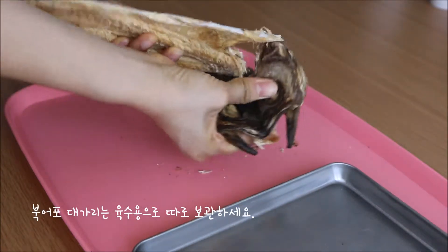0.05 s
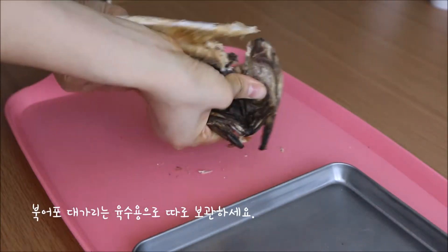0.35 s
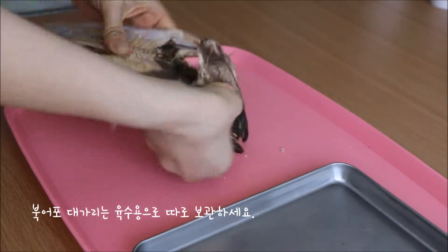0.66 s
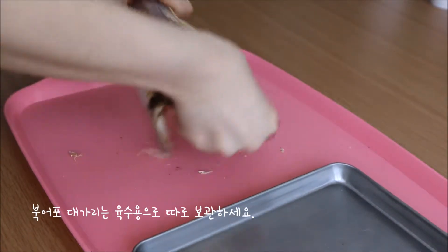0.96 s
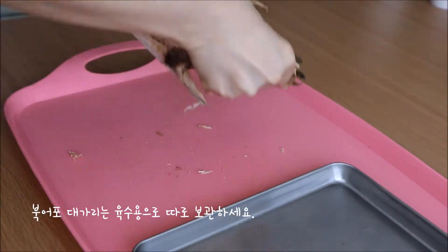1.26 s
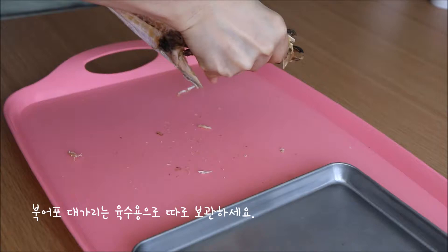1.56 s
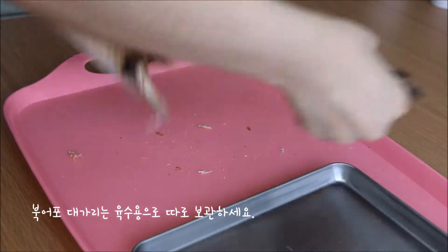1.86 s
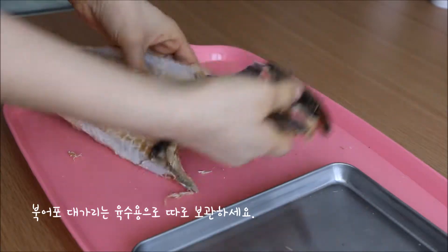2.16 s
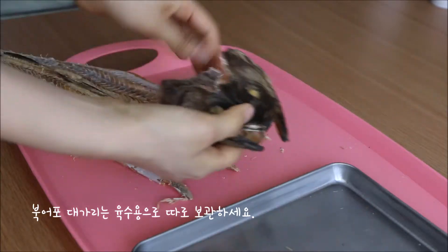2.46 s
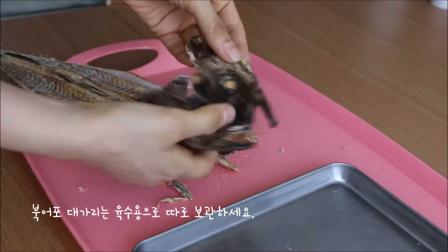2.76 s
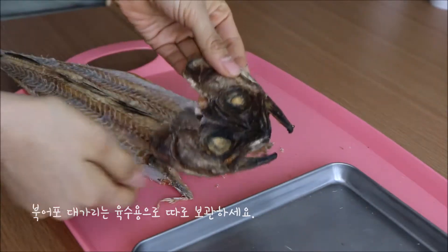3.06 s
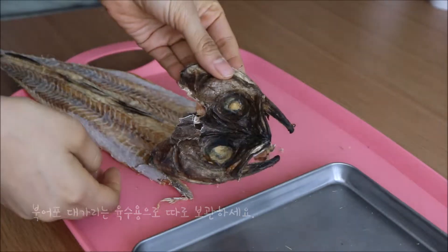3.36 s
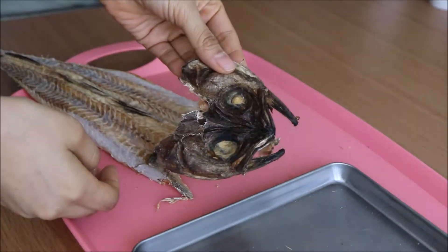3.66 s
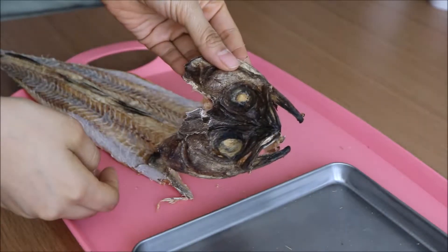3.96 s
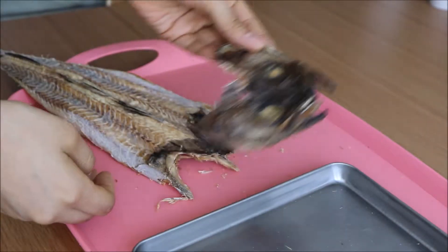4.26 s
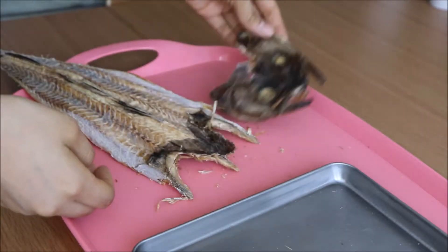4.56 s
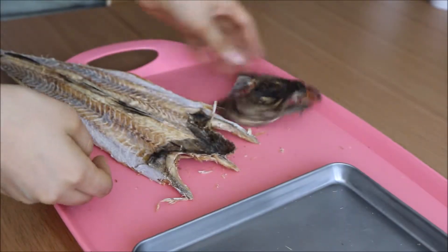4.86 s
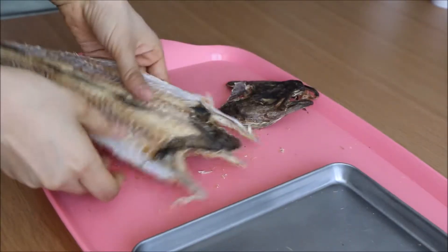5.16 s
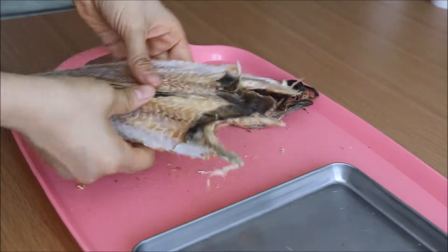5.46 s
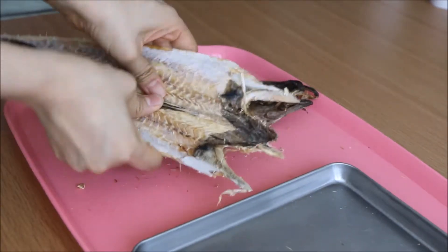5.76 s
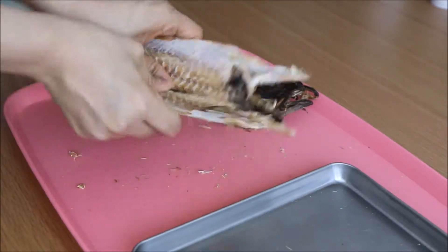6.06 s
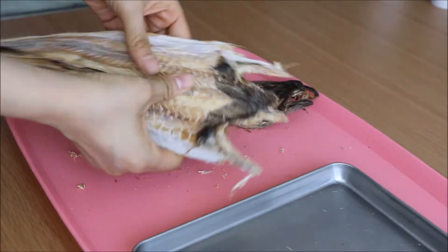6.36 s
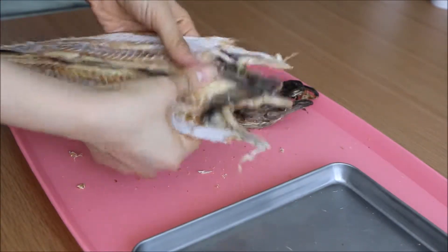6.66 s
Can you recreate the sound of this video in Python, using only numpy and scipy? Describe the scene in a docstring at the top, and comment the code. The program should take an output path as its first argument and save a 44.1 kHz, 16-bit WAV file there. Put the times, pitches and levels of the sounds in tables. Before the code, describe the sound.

Hands tear apart a brittle dried fish, crackling and snapping in bursts, with knocks on a plastic cutting board.

```python
"""A brittle dried fish is torn apart by hand over a plastic board in a bare kitchen.
Its fibres fail in avalanches of tiny fractures, its bones snap and its skin creaks by stick-slip
friction, all ringing the stiff body. Knocks and drags excite the modes of the board; jolts thud in
the table. The room reverberates, and a camera's focus drive ticks softly near the microphones."""
import sys
import numpy as np
from scipy import signal
from scipy.fft import rfft, irfft
from scipy.io import wavfile
from scipy.ndimage import uniform_filter1d

SR = 44100
rng = np.random.default_rng(int(sys.argv[2]) if len(sys.argv) > 2 else 0)


def generate_wav(sig):
    """Save sig (samples, or channels by samples) to the path in sys.argv[1] as 16-bit PCM at SR."""
    pcm = np.round(np.clip(np.atleast_2d(sig).T, -1, 1) * 32767).astype(np.int16)
    wavfile.write(sys.argv[1], SR, pcm)


N = 299880
TIME = np.arange(N) / SR
LEFT_RIGHT = np.array([[1], [-1]])

# Bones and skin snapping. Each row: start in seconds, relative level in dB, centre frequency in Hz.
BREAKS = [(0.143, -38, 5560), (0.3075, -24, 5100), (0.3145, -23, 4630), (0.457, -23.5, 3150),
          (0.513, -25, 3380), (0.648, -28.5, 5900.0), (0.6997, -34, 3700.0), (0.7522, -28, 6250),
          (0.7762, -18.5, 2200), (0.783, -24, 2800), (0.812, -23, 3080), (1.002, -31.5, 3270),
          (1.095, -33, 4800), (1.183, -34.5, 4700), (1.209, -32, 5400), (1.3, -38, 4200.0),
          (1.428, -31, 5500.0), (1.508, -32.5, 5000.0), (1.5972, -15.5, 4380), (1.5992, -16, 4200),
          (1.601, -20, 3900), (1.606, -22, 4900), (2.573, -51, 4260), (2.586, -48, 3300.0),
          (2.683, -53, 2500.0), (4.423, -48, 2520), (5.667, -46, 3800.0), (5.757, -25.5, 9100),
          (5.815, -27, 5760), (5.8549, -19.5, 6000), (5.8583, -23.5, 6260), (5.9082, -24, 3800.0),
          (5.9303, -15, 2920), (5.935, -23, 2020), (5.9384, -22.5, 2000), (6.376, -40, 2600)]


def undb(db):
    """Amplitude ratio of a level in decibels."""
    return 10 ** (np.asarray(db) / 20)


def unit(x):
    """Normalisation to an rms of 1."""
    return x / np.sqrt(np.mean(x ** 2))


def burst(x, db):
    """Equivalent level: x gets the energy of 10 ms of sound at db."""
    return x * undb(db) * np.sqrt(SR / 100 / np.sum(x ** 2))


def add(out, start_s, x):
    """Superposition of x on out from start_s."""
    i = min(max(int(start_s * SR), 0), N - 1)
    out[i:i + len(x)] += x[:N - i]


def at(points, hz):
    """Interpolation of (Hz, value) points on a log-frequency axis."""
    f, value = np.transpose(points)
    return np.interp(np.log(np.maximum(hz, 1)), np.log(f), value)


def ring(x, response):
    """Convolution with an impulse response."""
    return signal.fftconvolve(x, response)[:len(x)]


def highpass(x, hz=3200, order=1):
    """Butterworth high-pass filter."""
    return signal.sosfilt(signal.butter(order, hz, "high", fs=SR, output="sos"), x)


def band(x, hz, q):
    """Two-pole resonance with unit gain at its centre."""
    w = 2 * np.pi * min(hz, SR * .45) / SR
    a = np.sin(w) / (2 * q)
    return signal.lfilter([a, 0, -a], [1 + a, -2 * np.cos(w), 1 - a], x)


def colour(points, size=4096):
    """Minimum-phase impulse response of unit energy with the given (Hz, dB) spectrum."""
    cepstrum = irfft(np.log(undb(at(points, np.fft.rfftfreq(size, 1 / SR)))))
    cepstrum[1:size // 2] *= 2
    cepstrum[size // 2 + 1:] = 0
    return unit(irfft(np.exp(rfft(cepstrum)))) / np.sqrt(size)


def modes(rows, click, size=16384):
    """Modal impulse response of unit energy: a contact click plus damped sinusoids."""
    t = np.arange(size) / SR
    response = sum(undb(db - 60 * t / t60) * np.cos(2 * np.pi * hz * t) for hz, db, t60 in rows)
    response[0] += click
    return unit(response) / np.sqrt(size)


def clicks(rate, spread_db, even_s):
    """Poisson impulses of random size, their power held near 1 over even_s."""
    chance, size, sign = rng.random(N), rng.standard_exponential(N), rng.choice([-1, 1], N)
    x = (chance < rate / SR) * sign * undb(spread_db * np.minimum(size, 3.2))
    return x / np.sqrt(np.abs(uniform_filter1d(x ** 2, int(even_s * SR))) + 1e-6)


def wander(rate_hz):
    """Random modulation with an rms of 1."""
    knots = rng.standard_normal(N // 50)
    return unit(np.interp(TIME * rate_hz, np.arange(len(knots)), knots))


def strokes(rows, attack_s, release_s, share=1):
    """Incoherent sum of envelopes that rise, hold and decay, each giving a share of its power."""
    power = np.zeros(N)
    for (start, length, db, *_), part in zip(rows, np.ones(len(rows)) * share):
        t = np.arange(int((length + 10 * release_s) * SR)) / SR
        envelope = np.minimum(t / attack_s, 1) * np.exp(-np.maximum(t - length, 0) / release_s)
        add(power, start, np.clip(part, 0, 1) * (undb(db) * envelope) ** 2)
    return np.sqrt(power)


def background(whir_hz=1625, whir_db=-69):
    """Broadband noise gives room rumble and microphone hiss; narrowband noise, a small motor's whir."""
    # Noise floor. Each row: frequency in Hz, relative level in dB.
    spectrum = [(13, -60), (22, -5.5), (80, 0), (109, -9), (165, -2), (205, -20), (236, -3), (337, -9),
                (910, -11), (988, -14.5), (1130, -14), (1620, -7.5), (1810, -20), (3320, -26),
                (16000, -39.5)]
    mid, side = (ring(rng.standard_normal(N), colour(spectrum)) for _ in range(2))
    floor = mid + 1.45 * highpass(side, 900) * LEFT_RIGHT
    whir = unit(band(band(rng.standard_normal(N), whir_hz, q=13), whir_hz, q=13))
    return undb(-58 + 0.097 * wander(7.6)) * floor + undb(whir_db) * whir


def kitchen(x, wet_db, coherent_hz=2400, onset_s=0.0021, scatter_s=0.0015, size=24000):
    """Diffuse reverberation: closely spaced microphones hear its bass alike and its treble apart."""
    # Decay of the room. Each row: frequency in Hz, 60 dB decay time in seconds.
    decay_times = [(100, 0.36), (400, 0.39), (1200, 0.3), (3000, 0.3), (6000, 0.36), (14000, 0.3)]
    t, f = np.arange(size) / SR, np.fft.rfftfreq(size, 1 / SR)
    mid, side = rfft(rng.standard_normal((2, size)))
    coherence = 0.91 / (1 + (f / coherent_hz) ** 2)
    spectra = np.sqrt(1 + coherence) * mid + np.sqrt(1 - coherence) * side * LEFT_RIGHT
    centres = np.geomspace(100, 16000, 6)
    tail = 0
    for hz, pick in zip(centres, np.eye(len(centres))):
        band_noise = irfft(spectra * at(np.c_[centres, pick], f), size)
        tail += band_noise * undb(-60 * t / at(decay_times, hz))
    tail = unit(tail * np.clip(t / onset_s - .3, 0, 1)) * undb(wet_db)
    # short waves scatter off the camera body on their way to each microphone
    scatter = unit(rng.standard_normal(size) * np.exp(-t / scatter_s))
    responses = (tail + 0.73 * highpass(scatter) * LEFT_RIGHT) / np.sqrt(size)
    return np.array([ring(x, response) for response in responses])


def reflections(x, wet_db, spots, hop_hz):
    """Reflections depend on source position: x crossfades from spot to spot at constant power."""
    offsets = ((TIME * hop_hz - k + spots / 2) % spots - spots / 2 for k in range(spots))
    return sum(kitchen(x * np.cos(np.pi / 2 * np.clip(d, -1, 1)), wet_db) for d in offsets)


def focus_drive(tick_hz=1120, stop_hz=700, stop_s=0.0016, rebound=.42, rebound_s=0.012, size=3000):
    """Impact and rebound: the lens ticks, knocks on its stop, bounces twice and rings its barrel."""
    # Lens steps. Each row: start in seconds, relative level of the knock in dB.
    steps = [(0.405, -38), (0.674, -33.5), (1.045, -34.5), (1.169, -38.5), (1.217, -37.5), (1.329, -45),
             (1.365, -36.5), (1.489, -43), (1.526, -37), (1.695, -34.5), (1.728, -40), (1.776, -37),
             (1.969, -38.5), (2.018, -35.5), (2.321, -41), (2.356, -49), (2.608, -37.5), (2.667, -33.5),
             (2.735, -33.5), (2.769, -44), (2.806, -36), (2.929, -43), (2.966, -35.5), (3.088, -42.5),
             (3.125, -36), (4.849, -35), (4.892, -29.5), (5.123, -33), (5.296, -38), (5.407, -43),
             (5.454, -33.5), (5.534, -32.5), (5.568, -42), (5.604, -35), (5.728, -37), (5.777, -36.5)]
    out, t = np.zeros(N), np.arange(size) / SR
    for start, db in steps:
        kick = 0.08 * rng.standard_normal(size) * np.exp(-t / 0.013)
        kick[0] += 1
        tick = band(band(kick, tick_hz, q=1.65), tick_hz, q=1.4)
        pitch = stop_hz * (1 + 0.034 * rng.standard_normal())
        knock = np.exp(-((t - .0045) / stop_s) ** 2) * np.sin(2 * np.pi * pitch * t)
        barrel = band(knock, hz=765, q=31)
        bounces = sum(rebound ** k * np.roll(knock, int(k * rebound_s * SR)) for k in range(3))
        housing = np.roll(band(band(kick, 393, q=1.6), 393, q=1.6), int(0.0029 * SR))
        impact = burst(bounces, db - 3) + burst(barrel, db - 8.5) + burst(housing, db - 11.5)
        add(out, start, burst(tick, -44) + impact)
    return out


def table_thuds(gain_db=-3, width_octaves=0.79, sag_octaves_per_s=4.3):
    """Structure-borne sound: bumps pass into the table top; each thud deepens as the push settles."""
    # Pushes of hands and fish. Each row: start and length in seconds, relative level in dB,
    # initial centre frequency in Hz.
    jolts = [(0, .025, -42.5, 206), (0.799, 0.062, -27.5, 215), (0.902, 0.084, -39.5, 151),
             (3.713, 0.037, -48.5, 163), (3.82, 0.02, -55, 142), (4.056, 0.12, -44, 175),
             (4.335, .06, -48.5, 34), (4.412, .05, -51.5, 130), (5.216, .03, -30.5, 420),
             (5.25, 0.067, -29, 260), (5.366, 0.053, -34, 163), (5.497, 0.051, -40, 142),
             (5.618, 0.14, -47.5, 37), (6.494, 0.27, -45, 159), (6.682, 0.018, -31, 170),
             (6.765, 0.15, -36, 179)]
    starts, _, _, hz = np.transpose(jolts)
    latest = np.maximum(np.searchsorted(starts, TIME) - 1, 0)
    centre_octave = np.log2(hz[latest]) - sag_octaves_per_s * (TIME - starts[latest])
    bumps = clicks(rate=290, spread_db=3.5, even_s=0.012)
    out, power = 0, 0
    for k, f in enumerate(np.geomspace(32, 640, 10)):
        weight = 1 / (1 + ((np.log2(f) - centre_octave) / width_octaves) ** 2) ** 2
        delayed = np.roll(bumps, k * k * 30)  # decorrelates the bands
        out += weight * unit(band(band(delayed, f, q=1.24), f, q=1.24))
        power += weight ** 2
    return undb(gain_db) * strokes(jolts, attack_s=0.0096, release_s=0.049) * out / np.sqrt(power)


def plastic_board(knock_db=-7, drag_db=-5, chatter_db=-21, chatter_s=0.018, size=2500):
    """Chattering impacts and stick-slip friction excite the modes of the plastic board."""
    # Board modes. Each row: frequency in Hz, relative level in dB, 60 dB decay time in seconds.
    board_modes = [(134, -14.5, 0.35), (212, -41, 0.17), (252, -12, 0.19), (415, -3, 0.11),
                   (571, -9.5, 0.13), (692, -5.5, 0.029), (792, -2, 0.064), (872, -13, 0.2),
                   (980, -10, 0.12), (1012, -5.5, 0.21), (1036, -8, 0.08), (1113, -5.5, 0.06),
                   (1205, 1, 0.25), (1319, -7, 0.12), (1470, -9, 0.088), (1800, -14, .08),
                   (2060, -34, 0.054)]
    # Blows of fish and fingers. Each row: start in seconds, relative level in dB, cutoff in Hz.
    knocks = [(.7, -19.5, 1520), (.776, -21, 4000), (2.116, -16, 1370), (2.123, -12, 1360),
              (2.131, -17, 1300), (4.615, -24.5, 1070), (4.636, -22.5, 755), (4.689, -26.5, 1380),
              (4.85, -26.5, 1220), (4.893, -22, 790), (4.904, -18.5, 2780), (4.979, -18, 1100),
              (5.23, -25, 700), (5.931, -16.5, 2200), (5.9398, -26, 2200)]
    # The fish sliding. Each row: start and length in seconds, relative level in dB.
    drags = [(.41, 0.048, -33.5), (.52, 0.25, -38), (.695, 0.026, -25), (.8, 0.12, -29.5),
             (.93, 0.098, -36), (2.295, 0.045, -37), (3.725, 0.027, -51), (4.655, 0.071, -46),
             (4.99, 0.056, -26), (5.06, 0.035, -37), (5.315, 0.092, -41.5), (5.58, 0.019, -34.5),
             (5.83, 0.11, -38), (5.928, 0.016, -22.5), (6.21, 0.081, -41), (6.39, 0.064, -41),
             (6.55, 0.23, -44.5)]
    blows, t = np.zeros(N), np.arange(size) / SR
    for start, db, hz in knocks:
        push = undb(chatter_db) * rng.standard_normal(size) * np.exp(-t / chatter_s)
        push[0] += 1
        soft_contact = signal.butter(2, hz, fs=SR, output="sos")
        add(blows, start, burst(signal.sosfilt(soft_contact, push), db + knock_db))
    free = highpass(modes(board_modes, click=49), 170, order=2)
    # the fish's weight damps the board
    pressed = modes([(hz, db, 0.18 * t60) for hz, db, t60 in board_modes], click=61)
    slips = band(clicks(rate=480, spread_db=-2.0, even_s=0.038), 840, q=0.87)
    drag_gain = undb(drag_db) * strokes(drags, attack_s=0.0094, release_s=0.0097)
    return 0.5 * ring(blows, free) + drag_gain * unit(ring(slips, pressed))


def creaking(slip_hz=420, q=5.5, gain_db=-4):
    """Stick-slip friction in bent skin drives one narrow resonance with quick, uneven pulses."""
    # Each row: start and length in seconds, resonance in Hz, relative level in dB.
    creaks = [(0, 0.016, 1660, -25), (0.207, 0.082, 1960, -48), (0.949, 0.029, 2000, -30),
              (1.298, 0.034, 2410, -39), (1.561, 0.021, 2800, -44), (1.915, 0.043, 2630, -40.5),
              (2.573, .02, 4140, -47), (2.675, 0.022, 2780, -45), (6.373, 0.018, 3660, -36)]
    out = np.zeros(N)
    for start, length, hz, db in creaks:
        t = np.arange(int(length * SR)) / SR
        cycles = np.cumsum(slip_hz * (1 + .25 * wander(300)[:len(t)])) / SR
        slips = np.diff(np.floor(cycles), prepend=-1) + 0.094 * rng.standard_normal(len(t))
        swell = np.sqrt(np.sin(np.pi * t / length))
        add(out, start, undb(db + gain_db) * unit(band(slips, hz, q) * swell))
    return out


def snapping(run_s=0.002, run_db=-10, after_s=0.0059, after_db=-13, thump_hz=480, size=2000):
    """Brittle fracture: a ragged break sets off smaller cracks; thick, low bones also jerk the body."""
    out, t = np.zeros(N), np.arange(size) / SR
    for start, db, hz in BREAKS:
        crack = undb(run_db) * rng.standard_normal(size) * np.exp(-t / run_s)
        aftercracks = (rng.random(size) < .06) * rng.standard_normal(size)
        crack += undb(after_db) * aftercracks * np.exp(-t / after_s)
        crack[0] += 1
        thump = burst(band(crack, thump_hz, q=0.32), db - 16) * (3000 / hz) ** 2
        add(out, start, burst(band(crack, hz, q=0.63), db - 0.5) + thump)
    return out


def crack_arrest_db(hold_db=-5, hold_s=0.0051, surge_db=1.0, surge_s=0.013):
    """Crack arrest: the tear stalls while a bone takes the strain and surges once it snaps."""
    snap_times = np.r_[-np.inf, np.sort(np.array(BREAKS)[:, 0]), np.inf]
    following = np.searchsorted(snap_times, TIME, side="right")
    until, since = snap_times[following] - TIME, TIME - snap_times[following - 1]
    surge = np.exp(-since / surge_s)
    return surge_db * surge + hold_db * np.exp(-until / hold_s) * (1 - surge)


def tearing(gain_db=-2, grip_db=-65):
    """Acoustic emission: fibres fail in avalanches; thick flesh crunches and thin skin crackles."""
    # Fibres parting suddenly under a pull. Each row: start and length in seconds,
    # relative level in dB, share of skin against flesh from 0 to 1.
    rips = [(0, 0.026, -28.5, 0.3), (0.299, 0.047, -28.5, 0.46), (0.439, .03, -22.5, 0.13),
            (0.494, 0.074, -25.5, 0.23), (0.65, .05, -37.5, .7), (0.697, 0.028, -23, 0.4),
            (.735, .025, -28.5, 0.7), (0.799, 0.029, -22.5, 0.19), (0.998, 0.026, -32.5, 0.9),
            (1.083, 0.057, -37.5, 0.7), (1.213, 0.023, -34, 0.7), (1.292, 0.07, -36, 0.69),
            (1.412, 0.039, -34.5, 0.73), (1.624, 0.033, -27, 0), (1.716, .02, -41, 0.6),
            (1.934, 0.021, -42.5, 0.5), (2.109, 0.13, -43.5, 0.11), (2.662, 0.066, -45, 0.25),
            (4.611, 0.015, -41.5, 0.4), (4.705, 0.019, -39, 0.17), (4.89, 0.022, -40.5, 0),
            (4.982, 0.026, -35.5, .15), (5.232, 0.028, -43, 0.04), (5.317, 0.056, -43, 0.16),
            (5.761, 0.23, -33, 0.7), (5.856, 0.022, -30, 0.87), (5.921, .02, -26, 0),
            (6.188, 0.048, -36, 0.27), (6.362, 0.027, -38, 0.05)]
    # Soft handling rustles, and straining tears that build before the fish gives way. Same columns.
    swells = [(0.15, 0.47, -42, 0.84), (0.371, 0.18, -30, 0.42), (0.578, 0.42, -35, 0.41),
              (1.438, .14, -40, 0.73), (1.79, 0.34, -50.5, 0.46), (2.26, 0.036, -44, 0.25),
              (2.558, 0.27, -50.5, 0.39), (4.221, .11, -55.5, 0.35), (4.4, 0.036, -54.5, 0.2),
              (4.76, 0.052, -48.5, 0.54), (5.088, 0.069, -45.5, 0.1), (5.367, 0.33, -50, 0.24),
              (5.641, 0.12, -42.5, 0.58), (5.817, 0.079, -25, 0.47), (6.03, 0.28, -46.5, .6),
              (6.465, 0.15, -43.5, 0.2), (6.724, .08, -47, 0.34)]
    # Fracture spectra. Each row: frequency in Hz, relative level in dB.
    flesh_spectrum = [(100, -31), (250, -19), (500, -5), (1100, -1), (2200, 3), (3600, -1), (6000, -6.5),
                      (10000, -28), (16000, -42)]
    skin_spectrum = [(200, -39), (800, -43), (2000, 0), (4000, 1), (6000, 0), (9000, 0), (12500, -2.5),
                     (16000, -7.5)]

    def pull(rip_share, swell_share):
        """Rips, swells and the faint steady stir of the grip add in power."""
        sudden = strokes(rips, attack_s=0.0023, release_s=0.017, share=rip_share)
        gradual = strokes(swells, attack_s=0.019, release_s=0.033, share=swell_share)
        return np.sqrt(sudden ** 2 + gradual ** 2 + undb(grip_db) ** 2)

    fractures = clicks(rate=1300, spread_db=2.0, even_s=0.024)
    crunches = clicks(rate=900, spread_db=4.5, even_s=0.027)
    flesh = ring(0.69 * fractures + 0.71 * crunches, colour(flesh_spectrum))
    # splinters of different lengths each ring briefly at their own pitch
    splinters = sum(unit(band(clicks(rate=350, spread_db=-1.5, even_s=0.023), hz, q=1.17))
                    for hz in (4000, 5260, 7300, 11100))
    skin = ring(0.92 * fractures + 0.35 * splinters, colour(skin_spectrum))
    rip_skin, swell_skin = np.array(rips)[:, 3], np.array(swells)[:, 3]
    fibres = pull(1 - rip_skin, 1 - swell_skin) * flesh + pull(rip_skin, swell_skin) * skin
    avalanche_db = 2.0 * wander(110) + crack_arrest_db()
    return undb(gain_db + avalanche_db) * fibres


def dried_fish():
    """Resonance: tears, snaps and creaks ring the stiff, dry body."""
    # Body modes. Each row: frequency in Hz, relative level in dB, 60 dB decay time in seconds.
    body_modes = [(1163, -24.5, 0.23), (1700, -32, 0.011), (2570, -29, 0.021), (3120, -39, 0.0084),
                  (3380, -53, 0.018), (6600, -10.5, 0.0066)]
    return ring(tearing() + snapping() + creaking(), modes(body_modes, click=21))


def scene():
    """Superposition of direct sound, reverberation and background noise in stereo."""
    fish, board, thuds, lens = dried_fish(), plastic_board(), table_thuds(), focus_drive()
    direct = 1.05 * (fish + board + thuds) + lens
    direct -= .5 * highpass(direct)  # the camera body shades the treble
    room = reflections(fish, wet_db=0.3, spots=6, hop_hz=109.47)
    room += reflections(board + 0.43 * thuds + 0.36 * lens, wet_db=-0.5, spots=3, hop_hz=25.04)
    return direct + room + background()


def record(dry, ceiling=.8, top_hz=16050):
    """Soft saturation rounds the highest peaks; a steep low-pass limits the bandwidth."""
    lowpass = signal.ellip(10, .2, 70, top_hz, fs=SR, output="sos")
    return signal.sosfilt(lowpass, ceiling * np.tanh(dry / ceiling))


dry = scene()
out = record(dry)
generate_wav(out)
```